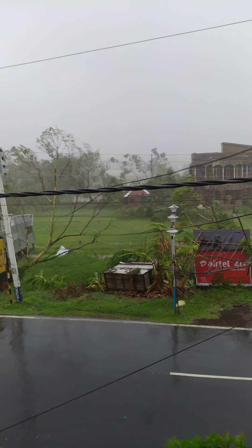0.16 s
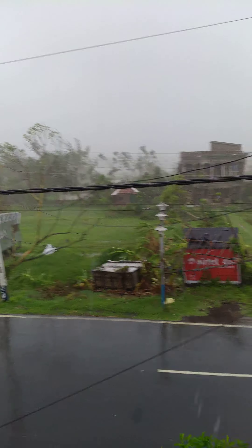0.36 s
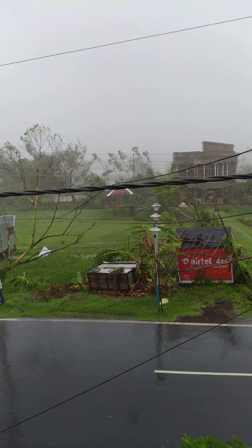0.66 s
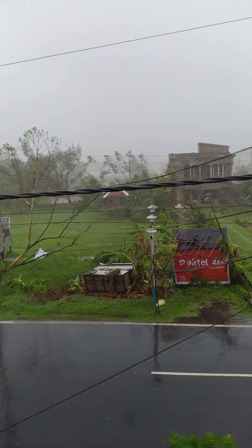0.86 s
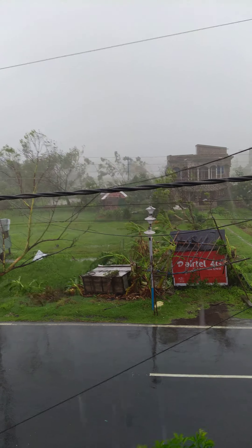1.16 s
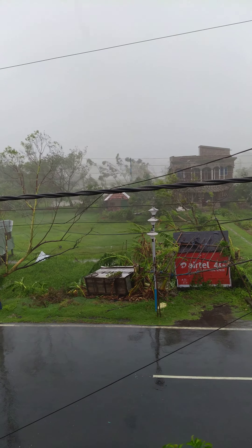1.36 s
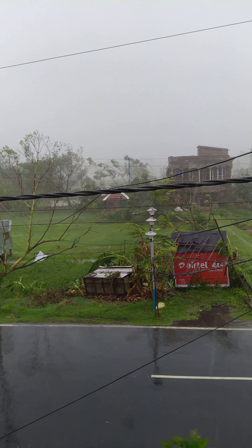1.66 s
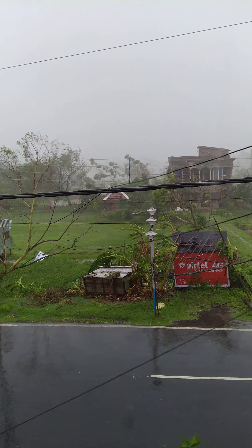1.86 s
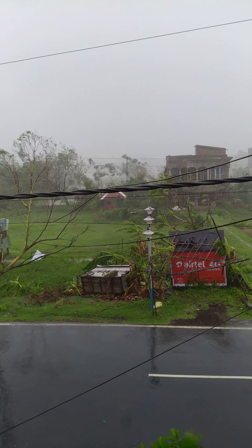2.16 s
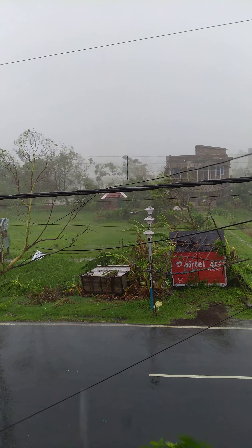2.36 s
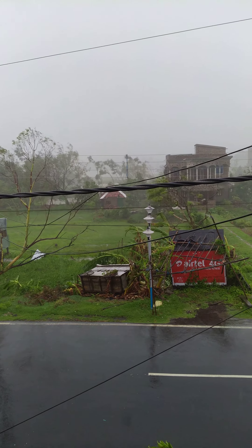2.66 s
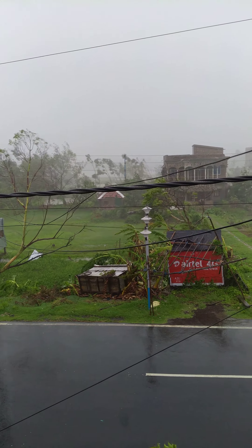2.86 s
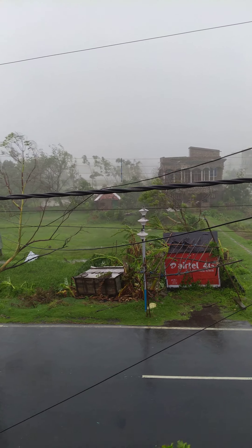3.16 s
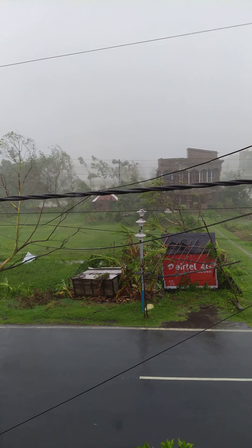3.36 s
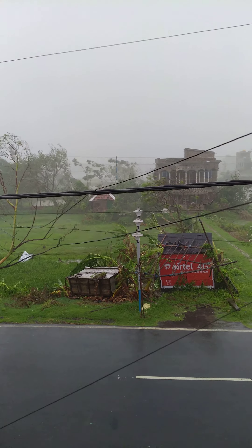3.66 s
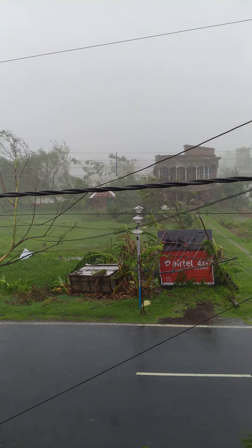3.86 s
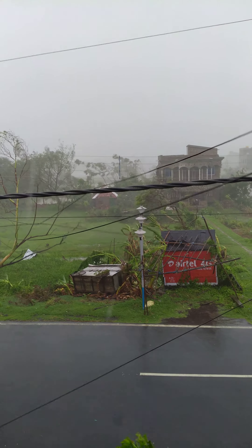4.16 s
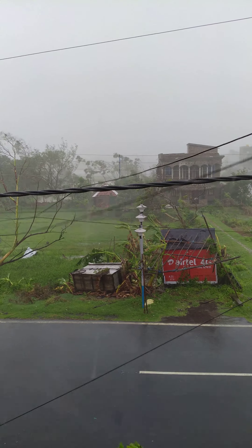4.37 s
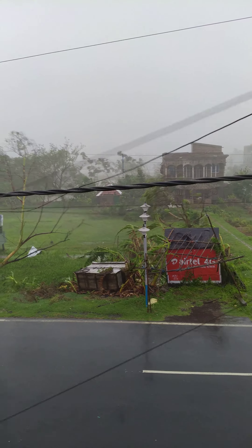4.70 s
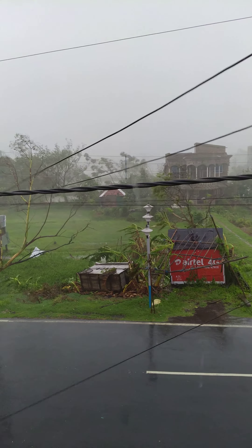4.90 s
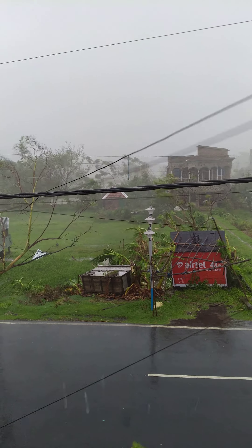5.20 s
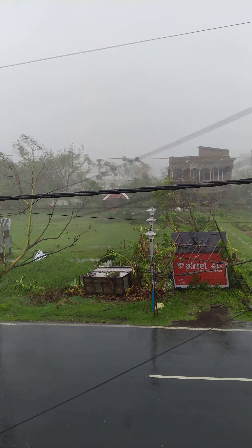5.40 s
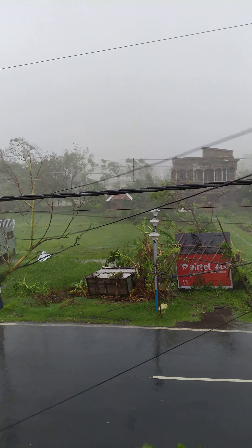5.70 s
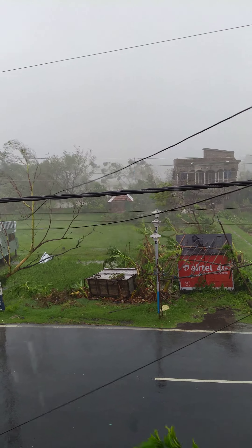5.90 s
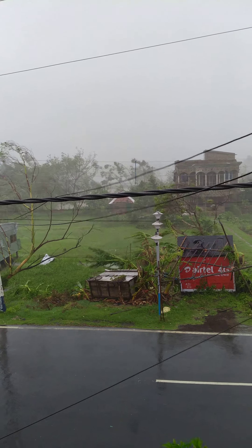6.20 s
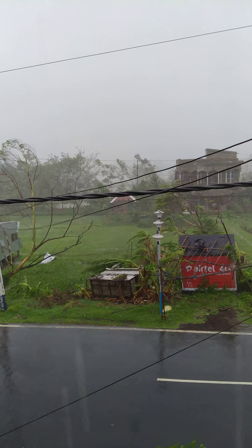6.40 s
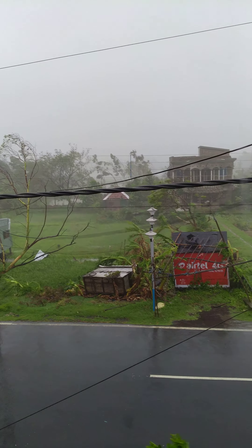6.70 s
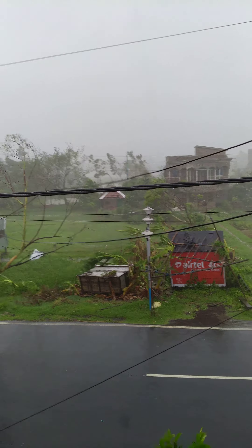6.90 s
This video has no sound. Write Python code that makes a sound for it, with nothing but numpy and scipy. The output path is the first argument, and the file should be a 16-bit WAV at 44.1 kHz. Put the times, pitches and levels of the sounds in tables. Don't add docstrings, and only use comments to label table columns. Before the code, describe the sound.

Two heavy gusts buffet and overload a microphone beside a wet road; between them rain hisses, leaves wash, wires moan and isolated eddies thump.

```python
import sys
import numpy as np
from scipy import signal
from scipy.fft import rfft, irfft, next_fast_len
from scipy.io import wavfile
from scipy.ndimage import uniform_filter1d, minimum_filter1d, map_coordinates

SR = 44100
rng = np.random.default_rng(int(sys.argv[2]) if len(sys.argv) > 2 else 0)


def wav_record(signal):
    frames = np.transpose(np.atleast_2d(signal))
    bounded = np.clip(frames, -1, 1)
    quanta = np.round(bounded * 32767).astype(np.int16)
    wavfile.write(sys.argv[1], SR, quanta)


def rack_gain(trim_db):
    fader = np.asarray(trim_db, float)
    return 10 ** (fader / 20)


N = 310904
SPLIT_HZ = 7950
RAIN_MEAN_DB = -45.5


def unit(x):
    return x / np.sqrt(np.mean(x ** 2) + 1e-20)


def curve(rows):
    start_s, level_db = np.transpose(rows)
    return np.interp(np.arange(N) / SR, start_s, level_db)


def wobble(rate):
    return map_coordinates(rng.standard_normal(N // 100), [np.arange(N) * rate / SR])


def filtered(x, response):
    m = next_fast_len(N + 8192)
    return irfft(rfft(x, m) * response(np.fft.rfftfreq(m, 1 / SR)), m)[..., :N]


def rush(spectrum, patchy_db):
    z = signal.stft(rng.standard_normal(N + 512), nperseg=512)[2]
    field = uniform_filter1d(rng.standard_normal(z.shape), size=6, axis=0)
    field = uniform_filter1d(field, size=5, axis=1)
    noise = signal.istft(z * rack_gain(patchy_db * unit(field)), nperseg=512)[1][:N]
    f, db = np.transpose(spectrum)
    return unit(filtered(noise, lambda hz: rack_gain(np.interp(np.log(hz + 1), np.log(f), db, -120, -120))))


def knocks(rows):
    out = np.zeros(N + SR)
    t = np.arange(SR // 5) / SR
    for start_s, peak_db, pitch_hz, swell_s, puff_db in rows:
        edges_hz = [min(1.8 * pitch_hz, 1300), min(6 * pitch_hz, 2400)]
        band = signal.butter(2, edges_hz, "band", fs=SR, output="sos")
        puff = unit(signal.sosfilt(band, rng.standard_normal(len(t))))
        swing = np.sin(2 * np.pi * pitch_hz * t) + rack_gain(puff_db - 4.5) * puff
        u = t / swell_s
        swell = (u * np.exp(1 - u)) ** 2
        out[round(start_s * SR):][:len(t)] += rack_gain(peak_db - 6.5) * swell * swing
    return out[:N]


def capped(db, top_db):
    knee_db = 1.5
    return -knee_db * np.logaddexp(-db / knee_db, -top_db / knee_db)


# start_s, level_db
WIRE_MOAN = [(0.0, -47), (1.7, -43), (2.1, -42), (3.2, -39.5), (6.2, -44), (6.52, -37.5), (6.8, -35),
             (7.05, -32.5)]
# pitch_hz, width_hz, level_db
WIRE_BANDS = [(737, 154, 2.5), (1410, 170, -5), (3170, 320, -10)]


def wires():
    def bands(f):
        return sum(rack_gain(db) / (1 + ((f - hz) / (width / 2)) ** 2) for hz, width, db in WIRE_BANDS)
    return rack_gain(curve(WIRE_MOAN) + 1.7 * wobble(16)) * unit(filtered(rng.standard_normal(N), bands))


# pitch_hz, level_db
TREE_SPECTRUM = [(22, -26), (70, -5), (120, 2.5), (400, -1), (720, -1), (850, -6.5), (950, -2), (1400, -1),
                 (2300, -5), (2550, -10), (3700, -13.5), (4600, -21.5), (6000, -26.5), (8000, -62)]


def trees(steady_db, sheet_db, swell_db):
    wash_db = -31 + 0.83 * (steady_db - RAIN_MEAN_DB) + 0.52 * sheet_db
    sway_db = 1.5 + 0.5 * swell_db + 0.6 * wobble(60)
    return rack_gain(wash_db + sway_db) * rush(TREE_SPECTRUM, patchy_db=0.7)


# start_s, level_db
RAIN_LEVEL = [(0.0, -50), (0.21, -48.5), (0.51, -51.5), (0.76, -49), (1.12, -50), (1.27, -41.5),
              (1.61, -46), (2.04, -48.5), (2.22, -45), (2.61, -46.5), (2.75, -44.5), (3.51, -45),
              (4.16, -39), (4.4, -47), (5.36, -45), (5.7, -47.5), (5.99, -40.5), (7.05, -47)]
# start_s, over_hiss_db, dying_s
RAIN_SHEETS = [
    (0.17, 6, .05),
    (0.72, 4, .04),
    (3.61, 2.5, 0.42),
    (3.611, 13.5, 0.039),
    (3.665, 8, .03),
    (4.82, 3.5, .1),
    (5.3, 4, 0.14),
    (6.9, 4, 0.38),
]


def rainfall():
    t = np.arange(N) / SR
    sheet_db = np.zeros(N)
    for start_s, over_db, dying_s in RAIN_SHEETS:
        strike = np.clip((t - start_s) / 0.01, 0, 1)
        sheet_db += over_db * strike * np.exp(-np.abs(t - start_s) / dying_s)
    return curve(RAIN_LEVEL), sheet_db


# pitch_hz, level_db
RAIN_SPECTRUM = [(2940, -43), (5000, -28), (6370, -8.5), (7400, -4), (7870, -2), (8500, 1.5), (8820, 2.5),
                 (12000, -20), (15600, -46), (22000, -120)]
# pitch_hz, level_db
SPRAY_SPECTRUM = [(6470, -34), (11000, -8.5), (11900, -8), (15100, -7), (15800, -6)]


def rain(steady_db, sheet_db, swell_db, flow_db):
    t = np.arange(N) / SR
    drops = (rng.random(N) < .0012) * rng.exponential(40, N)
    ticks = 1 + 1.8 * uniform_filter1d(drops, size=60)
    spray_db = -20 + 1.02 * t
    spray_db += 0.3 * (steady_db - RAIN_MEAN_DB) - 0.5 * sheet_db
    spray_db += 0.3 * np.clip(uniform_filter1d(flow_db, size=4000) + 6, 0, 12)
    hiss = unit(ticks ** .39 * rush(RAIN_SPECTRUM, patchy_db=-1.2))
    spray = rack_gain(spray_db) * unit(ticks ** .25 * rush(SPRAY_SPECTRUM, patchy_db=0.5))
    return rack_gain(steady_db + sheet_db + swell_db) * (hiss + spray)


# start_s, peak_db, pitch_hz, swell_s, noise_over_peak_db
NEAR_TAPS = [
    (3.63, -17, 1400, 0.0056, -2),
    (3.66, -20, 1360, 0.004, -9),
    (6.371, -16.5, 970, 0.0056, -17),
    (6.908, -14, 750, 0.0043, -7),
    (6.994, -8.5, 764, 0.0021, -1),
    (1.81, -35.0, 890, 0.052, 13.5),
    (2.2, -38, 920, .035, 5),
    (3.1, -32, 1200, 0.038, 12),
    (2.5, -32, 3800, 0.015, -4),
]


def taps():
    return knocks(NEAR_TAPS)


def storm(flow_db):
    steady_db, sheet_db = rainfall()
    swell_db = 0.66 * wobble(11) + 0.72 * wobble(45)
    return trees(steady_db, sheet_db, swell_db) + rain(steady_db, sheet_db, swell_db, flow_db) + taps()


# start_s, flow_db
WIND_FLOW = [(0.0, -13.5), (1.16, -13.5), (1.29, -22.5), (1.44, -35.5), (1.52, -38), (1.7, -55.5),
             (3.4, -60), (3.53, -37.5), (4.2, -32), (4.23, -15.5), (4.34, -12), (4.75, -7), (5.25, -10.5),
             (5.8, -13), (5.92, -16.5), (6.06, -25), (6.13, -57), (7.05, -50)]
# middle_s, half_length_s, change_db
WIND_SURGES = [(0.036, .03, 1.5), (0.214, 0.06, -1), (0.419, 0.12, 4), (0.526, 0.021, 4), (0.61, .03, 0.5),
               (0.693, 0.0093, 2.5), (0.922, 0.079, 2.5), (1.087, 0.064, 4), (1.31, 0.011, 4.5),
               (1.38, 0.013, 7), (1.894, 0.036, 17), (2.185, 0.027, 21), (2.26, 0.033, 10),
               (2.554, 0.024, 7), (2.725, .04, 18), (3.734, 0.054, 10), (3.855, .03, -8), (3.91, 0.027, 2),
               (4.175, 0.029, -8), (4.508, 0.047, 1), (4.778, .022, 0), (5.093, .025, -2.5),
               (5.188, 0.037, 2), (5.507, 0.11, -0.5), (5.7, 0.078, 2), (5.78, .022, 3), (5.827, 0.029, 0),
               (6.39, 0.023, 16), (6.536, 0.038, 17.5), (6.82, 0.03, 9)]


def flow():
    full_gust_db = -12
    t = np.arange(0, N + 32, 32) / SR
    surge_db = sum(db * np.exp(-((t - middle) / half) ** 4) for middle, half, db in WIND_SURGES)
    return curve(WIND_FLOW) - full_gust_db + np.interp(np.arange(N) / SR, t, surge_db)


# start_s, peak_db
OVERLOADS = [(.3576, -28), (.3976, -29), (.4218, -33), (.4518, -31), (.4635, -33), (.4819, -29),
             (.5161, -28), (.92, -31), (4.3774, -33), (4.4564, -31), (4.55, -31), (4.609, -31),
             (4.6455, -28), (4.6507, -29), (4.6805, -31), (4.7161, -31), (4.7463, -24), (4.7595, -31),
             (4.7688, -28), (4.7784, -29), (4.7902, -30), (4.8205, -25), (4.9034, -31), (4.9652, -30),
             (4.9911, -27), (5.028, -28), (5.1368, -30), (5.1652, -28), (5.2002, -26), (5.6962, -32)]


def crackle(rasp_db):
    kink_db = 28
    strength = np.clip((rasp_db + 28) / 12, 0, 1) ** 2
    swarm = rng.random(N) < 280 / SR * strength
    kinks = swarm * rack_gain(-39.5 + kink_db + 2.5 * rng.standard_normal(N))
    start_s, peak_db = np.transpose(OVERLOADS)
    kinks[np.round(start_s * SR).astype(int)] = rack_gain(peak_db + kink_db - 2.5)
    kinks *= rng.choice([-1, 1], N)

    def click_colour(hz):
        fall = (4000 / np.maximum(hz, 4000)) ** 2.8
        return (hz < SPLIT_HZ) * fall / (1 + (2600 / (hz + 1)) ** 4)
    return filtered(kinks, click_colour)


# start_s, peak_db, pitch_hz, edge_over_peak_db
PORT_THUMPS = [(2.164, -9, 147, -9), (2.169, -6.5, 310, -7), (2.185, -12, 300, -3), (2.179, -10, 135, -21),
               (2.194, -10, 310, -14), (2.214, -12.5, 125, -14), (2.244, -14, 164, -17),
               (2.334, -20, 249, -12), (2.363, -19, 117, -17), (2.532, -12.5, 114, -20),
               (2.714, -11.5, 141, -10), (2.761, -20, 139, -13), (3.571, -6.5, 113, -11),
               (3.664, -8, 170, -13), (3.69, -2, 150, -15), (3.743, -2.5, 120, -8), (3.756, -2, 202, -17),
               (3.765, -4, 120, -10), (3.794, -3, 128, -14), (3.89, -3, 157, -22), (3.915, -4, 122, -8),
               (4.01, -7.5, 130, -6), (4.034, -11, 157, -9), (4.08, -4, 126, -12), (4.109, -15, 154, -16),
               (4.214, -4, 108, -8), (6.03, -12, 206, -14), (6.054, -11, 164, -3), (6.074, -14, 119, 1)]


def thumps():
    return knocks([(s, db, hz, 0.87 / hz, edge_db) for s, db, hz, edge_db in PORT_THUMPS])


# pitch_hz, level_db
RUMBLE_SPECTRUM = [(30, -17), (60, -17.5), (100, -3.5), (170, -0.5), (280, -2), (500, -13), (1000, -70)]


def rumble(low_db, lump_db, weak):
    return rack_gain(low_db + lump_db - 2.9 * weak) * rush(RUMBLE_SPECTRUM, patchy_db=-2.0)


# pitch_hz, level_db
ROAR_SPECTRUM = [(100, -19), (200, -8.5), (350, -1), (700, -1), (1100, -8.5), (1800, -24), (3500, -64)]


def roar(flow_db, lump_db):
    level_db = capped(-12 + flow_db, top_db=-9.5)
    whole = rack_gain(level_db + 1.3 * lump_db + 0.31 * wobble(110)) * rush(ROAR_SPECTRUM, patchy_db=0.5)
    upper = filtered(whole, lambda hz: 1 / (1 + (500 / (hz + 1)) ** 3))
    tilt_db = 0.4 * np.clip(flow_db, -9, 6)
    return rack_gain(tilt_db) * upper + rack_gain(-tilt_db / 2) * (whole - upper)


# pitch_hz, level_db
RASP_SPECTRUM = [(500, -40), (900, 0.5), (1300, 2), (2000, -1), (2300, -6.5), (2800, -12.5), (3800, -26),
                 (5000, -67)]


def rasp(rasp_db, lump_db):
    flutter_db = 1.3 * wobble(40) + 2.6 * wobble(130)
    return rack_gain(rasp_db + 1.1 * lump_db + flutter_db) * rush(RASP_SPECTRUM, patchy_db=0.5)


def buffet(flow_db):
    low_db = capped(-15.5 + 0.57 * flow_db, top_db=-14.5) - 1.5 * wobble(11)
    rasp_db = -24 + 2.48 * flow_db
    weak = np.clip((-23.5 - low_db) / 12, 0, 1)
    lump_db = (0.6 + 1.3 * weak) * wobble(45)
    eddies = rumble(low_db, lump_db, weak) + roar(flow_db, lump_db) + rasp(rasp_db, lump_db)
    return eddies + thumps() + crackle(rasp_db)


def scene():
    flow_db = flow()
    return (wires() + storm(flow_db) + buffet(flow_db))[None]


def roll_off(x):
    return signal.sosfilt(signal.butter(12, 16950, fs=SR, output="sos"), x)


def record(dry):
    x = filtered(dry, lambda hz: 1 / np.sqrt(1 + (75 / (hz + 1)) ** 4.2))
    loud = np.sqrt(np.abs(uniform_filter1d(x ** 2, size=1100)))
    x = x * np.minimum(1, .27 / (loud + 1e-9)) ** .45
    low = filtered(x, lambda hz: hz < SPLIT_HZ)
    need = np.minimum(1, .95 / (np.abs(low) + 1e-9)) ** .95
    held = low * uniform_filter1d(minimum_filter1d(need, size=90), size=60)
    squeezed = held / (1 + np.abs(held / .885) ** 12) ** (1 / 12)
    joined = filtered(squeezed, lambda hz: hz < SPLIT_HZ) + x - low

    def seam(hz):
        return (1 - .7 * np.exp(-((hz - SPLIT_HZ) / 90) ** 2)) * (hz < 15740)
    return roll_off(filtered(joined, seam))


dry = scene()
out = record(dry)
wav_record(out)
```